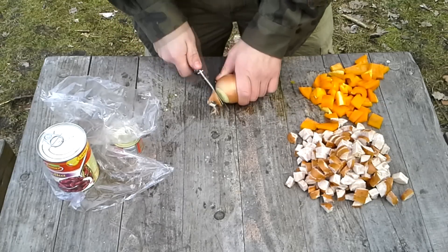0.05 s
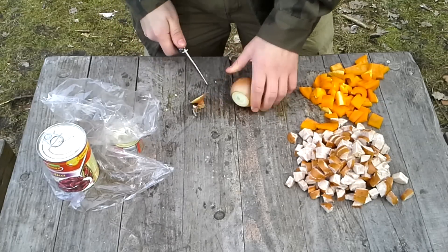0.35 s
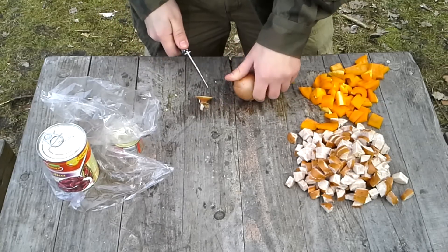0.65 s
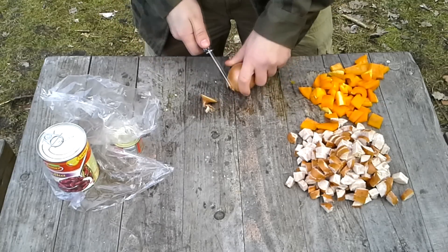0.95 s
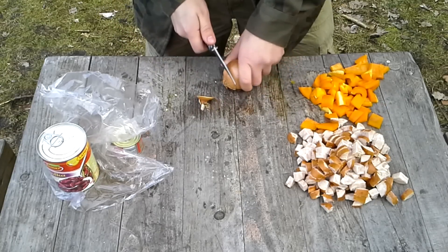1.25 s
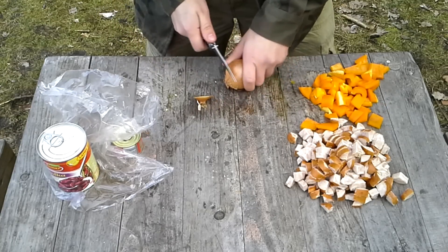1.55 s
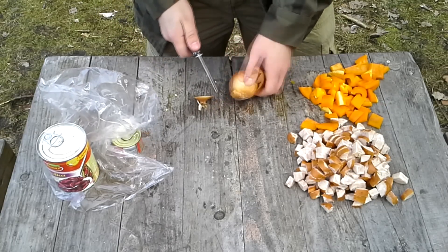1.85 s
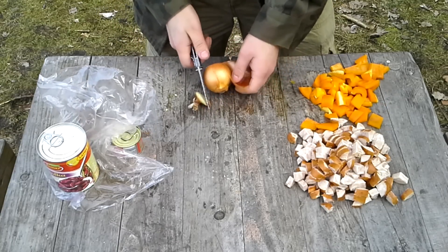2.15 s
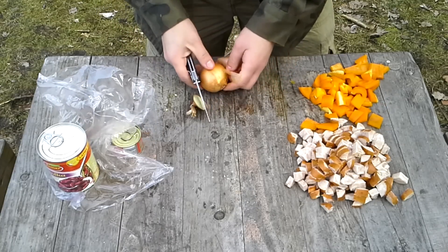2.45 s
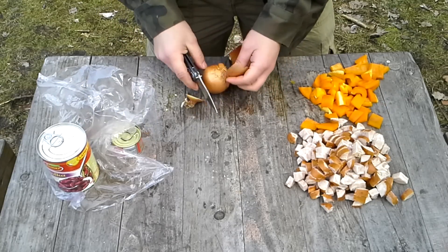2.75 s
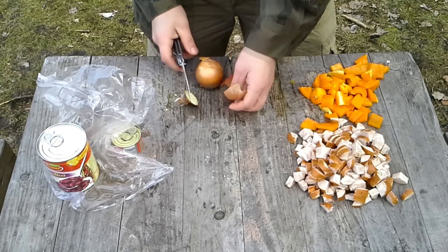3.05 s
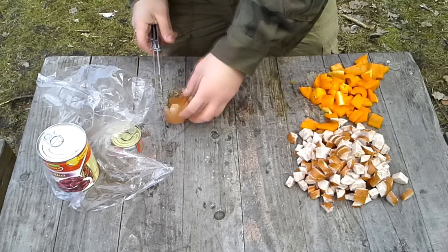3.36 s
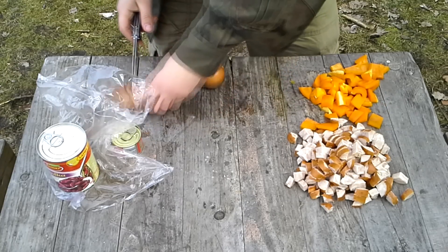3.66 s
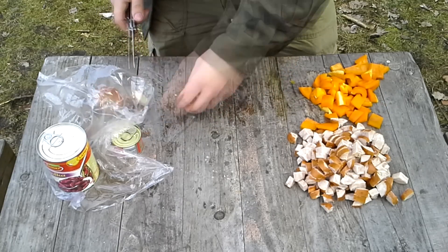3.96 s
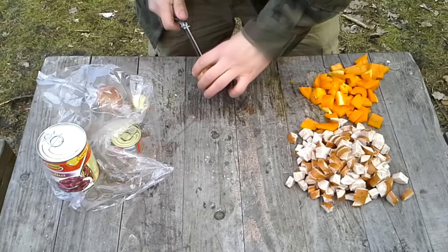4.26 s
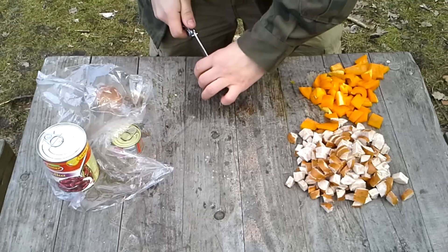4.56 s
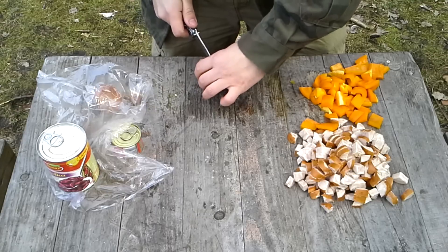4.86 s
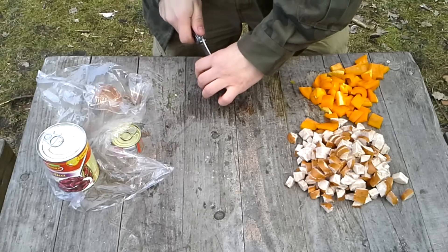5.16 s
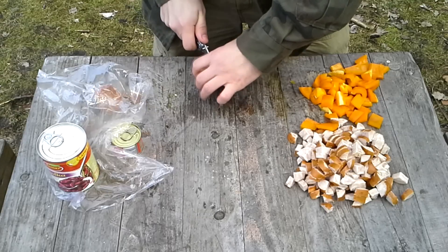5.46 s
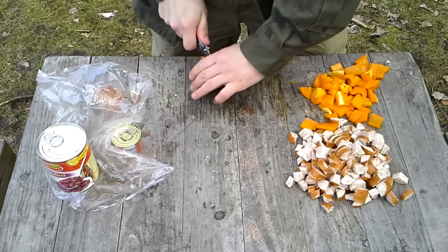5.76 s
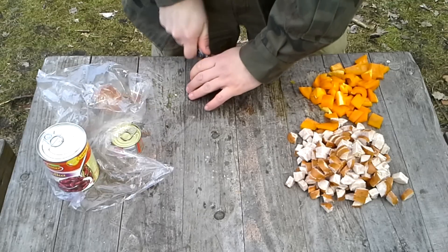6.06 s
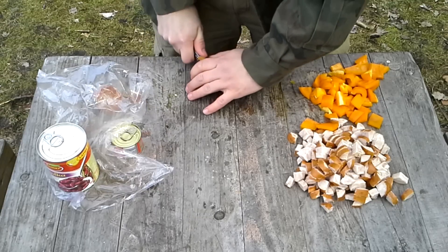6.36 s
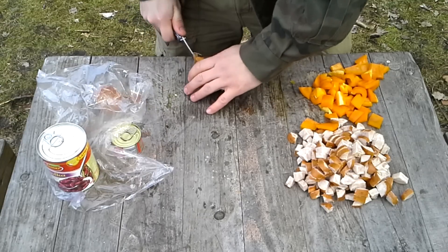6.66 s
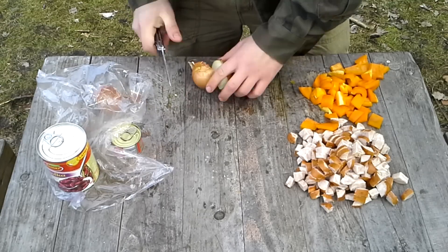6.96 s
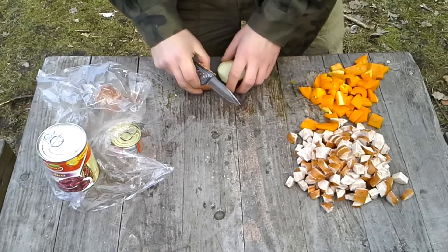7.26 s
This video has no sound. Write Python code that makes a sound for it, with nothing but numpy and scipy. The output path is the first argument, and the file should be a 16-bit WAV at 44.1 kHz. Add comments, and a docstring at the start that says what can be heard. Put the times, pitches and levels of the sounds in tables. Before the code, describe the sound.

A knife cuts into an onion with a crisp crackle and dull knocks on a wooden table. Dry skin snaps and tears in short papery bursts, and the peel is pushed into a softly crinkling plastic bag. Then the blade crunches through the onion with a fine judder and knocks on the planks. Hands shuffle and tap faintly throughout, heard fairly close in very quiet open air.

```python
"""An onion is trimmed, peeled and halved on a wooden table outdoors.
Each stroke of knife or fingers builds up, holds and lets go. Dry skin crinkles and snaps in tiny
fractures, the peel is stuffed into a plastic bag, and the blade bursts cells, judders through the
layers and knocks on the planks. Hands shuffle and tap over very quiet open air."""
import sys
import numpy as np
from scipy import signal
from scipy.fft import rfft, irfft
from scipy.io import wavfile

SR = 44100
rng = np.random.default_rng(int(sys.argv[2]) if len(sys.argv) > 2 else 0)


def output_pcm(signal):
    """Save a mono or channel-first signal as 16-bit PCM at the path in sys.argv[1].

    Samples are clipped to [-1, 1] before scaling.
    """
    pcm = np.clip(np.atleast_2d(signal).T, -1, 1) * 32767
    wavfile.write(sys.argv[1], SR, np.round(pcm).astype(np.int16))


N = 322635
TIME = np.arange(N) / SR
SPLIT_HZ = 5800  # body below, treble above

# Hands and onion sliding on wood. Each row: start in seconds, length in seconds, level in dB, swell in dB.
SLIDES = [(0, 0.3, -65.5, -0.5), (.35, 0.43, -70, -4), (1.08, 0.77, -79.5, 8), (1.85, 0.47, -64.5, -3),
          (2.45, 0.18, -65, 5), (2.73, 0.8, -74, -6), (3.42, 0.38, -68.5, 3), (4.76, 0.094, -74, -3),
          (5.17, 0.089, -60, -5.5), (5.4, 0.7, -69, 18.5), (5.97, 0.67, -64, -11), (6.7, 0.53, -72.5, -7)]
# Spectra of dry skin and of flesh. Each row: frequency in Hz, gain in dB.
SKIN_SPECTRUM = [(200, -23.5), (850, -8), (1150, -1.5), (1700, -4.5), (2200, -5.5), (3100, -5),
                 (4800, -2.5), (6100, -11), (7600, 0.5), (9700, -2), (15500, -1.5)]
FLESH_SPECTRUM = [(200, 2.5), (600, -1.5), (2100, 0.5), (4500, -3.5), (6100, -7.5), (7700, 0.5), (9500, -3),
                  (12500, 0.5), (15500, -2.5)]


def undb(db):
    """Decibels to gain."""
    return 10 ** (np.asarray(db) / 20)


def unit(x):
    """Scale to rms 1."""
    return x / np.sqrt(np.mean(x ** 2))


def add(out, start_s, x):
    """Mix x into out."""
    i = max(0, int(start_s * SR))
    out[i:i + len(x)] += x[:max(0, N - i)]


def butter(x, hz, kind, order=2):
    """Butterworth filter."""
    return signal.sosfilt(signal.butter(order, hz, kind, fs=SR, output="sos"), x)


def peak(x, hz, width_hz):
    """One resonance, gain 1 at centre, Q at most 50."""
    return signal.lfilter(*signal.iirpeak(hz, min(hz / width_hz, 50), fs=SR), x)


def resonate(x, level_db, hz, width_hz):
    """x plus a resonance that it drives."""
    return x + peak(x, hz, width_hz) * undb(level_db)


def colour(x, spectrum, size=1024):
    """Minimum-phase filter from (Hz, dB) points; attacks stay sharp."""
    hz, db = np.transpose(spectrum)
    gain = undb(np.interp(np.log(np.fft.rfftfreq(size, 1 / SR) + 1), np.log(hz), db))
    cepstrum = irfft(np.log(gain))[:size // 2]
    cepstrum[1:] *= 2
    return signal.fftconvolve(x, irfft(np.exp(rfft(cepstrum, size))))[:len(x)]


def balance(x, body_db):
    """Set body relative to treble; rms near 1."""
    body, treble = (unit(butter(x, SPLIT_HZ, kind, order=3)) for kind in ("low", "high"))
    return (undb(body_db) * body + treble) / np.sqrt(1 + undb(2 * body_db))


def wander(rate_hz):
    """Random drift, rms 1."""
    steps = rng.standard_normal(int(N / SR * rate_hz) + 2)
    return unit(np.interp(TIME * rate_hz, np.arange(len(steps)), steps))


def strokes(rows, attack_s, release_s, fade_db=33):
    """One dB curve per stroke: builds up, swells or slackens while held, lets go."""
    curves = []
    for start_s, length_s, db, swell_db, *_ in rows:
        end_s = start_s + length_s
        first_db, last_db = db - swell_db / 2, db + swell_db / 2
        corners_s = [start_s - attack_s, start_s, end_s, end_s + release_s]
        corners_db = [first_db - fade_db, first_db, last_db, last_db - fade_db]
        curves.append(np.interp(TIME, corners_s, corners_db, -np.inf, -np.inf))
    return np.array(curves)


def fracture(t, hz, fall_s, width_hz=900, flake_db=8):
    """A crack gives way at once, rings its flake and leaves faint scatter from the table."""
    scatter = undb(-23) * np.exp(-t / 0.005)
    burst = rng.standard_normal(len(t)) * (np.exp(-t / fall_s) + scatter)
    return resonate(burst, flake_db, hz, width_hz)


def crinkle(level_db, spectrum, max_rate_hz, spread_db, hiss_db, flakes=6):
    """Tiny fractures over sliding hiss: lone ticks when gentle, a dense tear when loud."""
    level = undb(level_db)
    density = np.sqrt(level / level.max())
    grains, t = np.zeros(N), np.arange(SR // 20) / SR
    for _ in range(flakes):
        sizes = unit(undb(spread_db * np.minimum(rng.exponential(size=N), 2)))
        fires = rng.random(N) < density * max_rate_hz / flakes / SR
        kicks = fires * sizes * rng.choice([-1, 1], N)
        grain = unit(fracture(t, rng.uniform(2500, 14000), fall_s=0.0005)) / np.sqrt(len(t))
        grains += signal.oaconvolve(kicks, grain)[:N]
    grains *= np.sqrt(SR / max_rate_hz / (density + 1e-6))  # fewer grains share the same power
    x = colour(grains + undb(hiss_db) * rng.standard_normal(N), spectrum)
    return x / x[level > 0].std() * level


def open_air():
    """A wavering low rumble under steady faint hiss."""
    # Each row: frequency in Hz, gain in dB.
    air_spectrum = [(25, -11.5), (55, -1.5), (110, -10), (230, -16.5), (700, -23), (3000, -30.5),
                    (5900, -43.5), (15500, -32)]
    air = unit(colour(rng.standard_normal(N), air_spectrum, size=8192)) * undb(-69.5)
    rumble = butter(air, 180, "low", order=1)
    hiss = air - rumble
    waver_db = -1.5 + 2.5 * np.tanh(wander(6.5))
    return hiss + rumble * undb(waver_db)


def planks(push):
    """The table's damped modes answer a push."""
    # Each row: frequency in Hz, level in dB, 60 dB decay time in seconds.
    plank_modes = [(145.2, -0.5, 0.26), (242, 0, 0.1), (300, 0.5, 0.1), (366.4, -3, 0.15),
                   (455, -1.5, 0.13), (642, -0.5, 0.081), (1120, -10.5, 0.04)]
    t = np.arange(SR // 4) / SR
    ring = sum((-1) ** k * undb(db - 60 * t / t60_s) * np.sin(2 * np.pi * hz * t)
               for k, (hz, db, t60_s) in enumerate(plank_modes))
    return signal.fftconvolve(push, ring)[:len(push)]


def shuffle(grip=0.78):
    """Hands and onion catch and slip on the wood; the table rumbles under the load."""
    level = undb(strokes(SLIDES, attack_s=0.08, release_s=0.31).max(axis=0))
    push = rng.standard_normal(N) * (1 + grip * np.tanh(wander(40)))
    wood = unit(planks(butter(push, 120, "low", order=1)))
    rub = unit(colour(push, [(60, -16), (145, -1.5), (220, -7), (400, -8), (3000, -29)]))
    rumble = unit(butter(rng.standard_normal(N), [45, 130], "band")) * np.tanh(level / undb(-75))
    return (undb(-17) * wood + undb(4.5) * rub) * level + undb(-69.5) * rumble


def handling_rustle():
    """Dry skin rustles softly whenever the hands move the onion."""
    level_db = strokes(SLIDES, attack_s=0.069, release_s=0.5).max(axis=0) - 6.5
    return crinkle(level_db, SKIN_SPECTRUM, max_rate_hz=2500, spread_db=7.5, hiss_db=-3)


def peeling():
    """Papery skin crumples and tears under knife and fingers; large flakes have more body."""
    # Each row: start in seconds, length in seconds, level in dB, swell in dB, body weight in dB.
    peel_strokes = [(0.01, .075, -38, -1.5, -3), (.11, 0.082, -62, -8, 1), (0.362, 0.048, -58, 7, -6.5),
                    (0.643, 0.075, -65.5, 0, -1), (1.095, 0.031, -71.5, -6, -1.5),
                    (1.546, 0.016, -63.5, -7, -5), (1.785, 0.13, -39, 8, -5.5),
                    (1.924, 0.096, -45, -13.5, -8), (2.103, 0.22, -59, -6.5, 1),
                    (2.39, 0.065, -59, -3.5, -1), (2.496, 0.092, -47, 6, -3),
                    (2.557, 0.071, -52.5, -10, -6), (2.805, 0.02, -60.5, 6, -6)]
    curves_db = strokes(peel_strokes, attack_s=0.029, release_s=0.041)
    x = crinkle(curves_db.max(axis=0), SKIN_SPECTRUM, max_rate_hz=2400, spread_db=7, hiss_db=-6)
    weight = undb(np.array(peel_strokes)[:, 4])[curves_db.argmax(axis=0)]  # of the loudest stroke
    body, treble = (butter(x, SPLIT_HZ, kind, order=3) for kind in ("low", "high"))
    return (2 * weight * body + treble) / np.sqrt(1 + weight ** 2)


def snaps():
    """Loud fractures of skin and flesh, each with a weaker second crack; small flakes sound thin."""
    # Each row: start in seconds, level over 2 ms in dB, flake pitch in Hz.
    cracks = [(0.012, -32.5, 1960), (0.0414, -29, 9700), (0.1009, -28, 7400), (0.1202, -37.5, 7500),
              (0.225, -40.5, 7500), (0.234, -46.5, 7960), (0.624, -57, 8800), (0.6926, -39.5, 10700),
              (0.707, -45.5, 14000), (1.759, -37.5, 12400), (1.7637, -36, 8000), (1.783, -41.5, 3470),
              (1.8054, -23, 7940), (1.816, -28, 7700), (1.8219, -33.5, 7600), (1.8263, -29, 4500),
              (1.8492, -39, 7500), (1.8947, -35, 3020), (1.898, -34.5, 3100), (1.9058, -36.5, 2980),
              (1.9137, -26.5, 7500), (1.9455, -30.5, 12000), (1.9662, -32, 12700), (2.058, -43.5, 7500),
              (2.1012, -37.5, 9500), (2.11, -39, 5150), (2.119, -38, 9050), (2.1302, -33.5, 7000),
              (2.1499, -39, 7300), (2.1588, -49, 8600), (2.1684, -49, 8000), (2.202, -35.5, 4340),
              (2.2376, -42, 5200), (2.243, -53, 5300), (2.2628, -38, 6500), (2.2913, -40, 3400),
              (2.3871, -41, 7600), (2.435, -44.5, 7040), (2.4414, -44.5, 3730), (2.5275, -36, 3640),
              (2.5336, -39, 3250), (2.5418, -44, 3200), (2.552, -37, 3240), (2.5546, -30, 11800),
              (2.562, -36, 3400), (2.6453, -44.5, 8000), (2.734, -49, 7840), (2.7417, -44.5, 8300),
              (3.3765, -54.5, 3970), (4.76, -61, 4000), (5.162, -45, 12500), (5.2076, -35.5, 12400),
              (5.4674, -52, 13000), (5.7717, -48, 2450), (5.923, -45.5, 8900), (6.012, -45, 7200),
              (6.0372, -37.5, 7900), (6.159, -44.5, 5100), (6.513, -40.5, 11200), (6.5438, -41, 7900),
              (6.5811, -36, 8460), (6.697, -46.5, 5200), (6.7086, -41.5, 6660), (6.9724, -52, 9000)]
    out, t = np.zeros(N), np.arange(SR // 20) / SR
    for start_s, db, hz in cracks:
        for lag_s, drop_db in ((0, 0), (rng.uniform(0.001, 0.005), -6)):
            x = fracture(t, hz, fall_s=0.0007, width_hz=730, flake_db=7)
            x = resonate(x, level_db=6, hz=rng.uniform(1500, 14000), width_hz=700)  # curled skin
            x = balance(colour(x, SKIN_SPECTRUM), body_db=9 * np.log2(4250 / hz))
            add(out, start_s + lag_s, x * undb(db + drop_db) * np.sqrt(0.002 * SR / len(t)))
    return out


def knocks():
    """Blade, onion and hands hit the planks; soft blows lose the high modes, hard ones the lowest."""
    # Each row: start in seconds, peak in dB, hardness as low-pass cutoff in Hz.
    blows = [(0.015, -32, 510), (0.1, -44, 416), (0.507, -57, 199), (0.661, -53, 137), (1.117, -61.5, 141),
             (3.08, -49, 129), (3.139, -50, 133), (3.761, -46.5, 293), (5.646, -47, 108.4),
             (6.045, -33.5, 595), (6.578, -41, 1140)]
    out, t = np.zeros(N), np.arange(SR // 4) / SR
    ring = unit(planks(signal.unit_impulse(len(t))))
    for start_s, db, cutoff_hz in blows:
        thud = unit(butter(rng.standard_normal(len(t)), [130, 3000], "band") * np.exp(-t / 0.0054))
        x = butter(ring + undb(-1.5) * thud, cutoff_hz, "low")
        x = butter(x, 0.52 * cutoff_hz, "high")
        add(out, start_s, x / np.abs(x).max() * undb(db))
    return out


def taps(fall_s=0.0038, width_hz=230):
    """Light touches of finger or knife on the onion ring two damped modes, with a dry tick."""
    # Each row: start in seconds, peak in dB, pitch in Hz.
    touches = [(0.576, -57, 1631), (.6928, -41.5, 3620), (4.225, -60.5, 1890), (4.398, -58, 1850),
               (4.423, -60, 2750), (5.536, -55, 540), (6.707, -42, 4970)]
    out, t = np.zeros(N), np.arange(SR // 20) / SR
    for start_s, db, hz in touches:
        tick = butter(rng.standard_normal(len(t)), [500, 4500], "band", order=1) * np.exp(-t / fall_s)
        modes = peak(tick, hz, width_hz) + undb(-13) * peak(tick, 1.62 * hz, width_hz)
        x = modes + undb(-17) * tick
        add(out, start_s, x / np.abs(x).max() * undb(db))
    return out


def shell_ring(onion):
    """Pulls set the loose shell of peel ringing."""
    # Each row: start in seconds, length in seconds, resonance gain in dB, swell in dB.
    pulls = [(1.893, 0.022, -2, 2), (2.5, 0.075, 1.5, 0)]
    level_db = strokes(pulls, attack_s=0.03, release_s=0.048).max(axis=0)
    return resonate(onion, level_db, hz=3250, width_hz=350)


def bag():
    """Peel brushes into thin plastic film: a finer, softer crinkle."""
    # Each row: start in seconds, length in seconds, level in dB, swell in dB.
    pushes = [(3.43, 0.064, -66.5, 14), (3.58, 0.04, -49, 0.5), (3.63, 0.15, -57.5, -3.5)]
    # Each row: frequency in Hz, gain in dB.
    film_spectrum = [(200, -10), (700, 1), (1500, 1.5), (4200, -2.5), (6000, -6.5), (7600, 1), (15500, -1)]
    level_db = strokes(pushes, attack_s=0.07, release_s=0.084).max(axis=0)
    return crinkle(level_db, film_spectrum, max_rate_hz=1100, spread_db=5.5, hiss_db=-2)


def slicing():
    """Cells burst ahead of the blade, over the wet rasp of its sides."""
    # Each row: start in seconds, length in seconds, level in dB, swell in dB.
    cuts = [(5.165, 0.055, -55, 7), (5.22, 0.041, -56.5, 5), (5.63, 0.027, -57.5, -2),
            (5.82, 0.043, -58, -13.5), (5.93, 0.11, -51.5, 12), (6.06, 0.32, -54.5, -2),
            (6.44, 0.15, -52, -2.5), (6.7, 0.048, -66, 0)]
    level_db = strokes(cuts, attack_s=0.026, release_s=0.082).max(axis=0)
    return crinkle(level_db, FLESH_SPECTRUM, max_rate_hz=1300, spread_db=10, hiss_db=-5.5)


def blade_ring(onion, blade_hz):
    """The wedged blade sings while forced down."""
    # Each row: start in seconds, length in seconds, resonance gain in dB, swell in dB.
    presses = [(6.24, 0.24, 3, 2)]
    level_db = strokes(presses, attack_s=0.37, release_s=0.085).max(axis=0)
    return resonate(onion, level_db, blade_hz, width_hz=950)


def judder(blade_hz, rate_hz=72, jitter=0.23):
    """The blade sticks and slips from layer to layer: nearly regular thin clicks ring the steel."""
    # One row: start in seconds, length in seconds, click level in dB.
    wedged_cut = (6.23, .3, -50)
    start_s, length_s, db = wedged_cut
    out, t = np.zeros(N), np.arange(SR // 20) / SR
    for k, (late, size) in enumerate(rng.standard_normal((60, 2))):
        click = colour(fracture(t, blade_hz, fall_s=0.00036), FLESH_SPECTRUM)
        click = balance(click, body_db=-20.5)
        slip_s = (k + jitter * late) / rate_hz
        click_db = db + 0.5 * np.sin(np.pi * slip_s / length_s) + 5 * np.tanh(size)
        if slip_s < length_s:
            add(out, start_s + slip_s, click * undb(click_db) * np.sqrt(0.002 * SR / len(t)))
    return out


def scene():
    """Mono mix; the onion's own sounds drive the shell and blade resonances."""
    blade_hz = 7380
    onion = snaps() + peeling() + slicing() + handling_rustle() + judder(blade_hz)
    onion = blade_ring(shell_ring(onion), blade_hz)
    table = knocks() + shuffle()
    return (onion + table + taps() + bag() + open_air())[None]


def record(dry):
    """Steep low-pass at 16 kHz."""
    return signal.sosfilt(signal.ellip(10, 0.2, 70, 16000, fs=SR, output="sos"), dry)


dry = scene()
out = record(dry)
output_pcm(out)
```